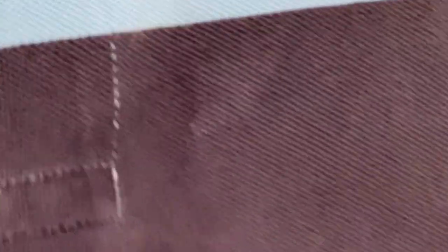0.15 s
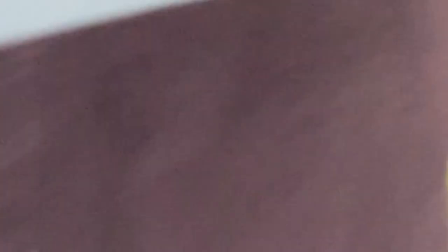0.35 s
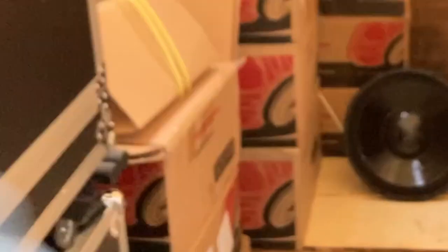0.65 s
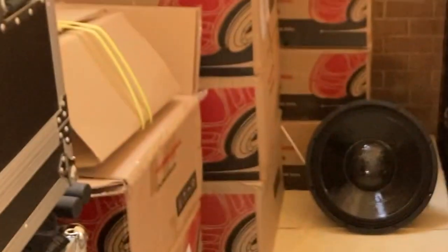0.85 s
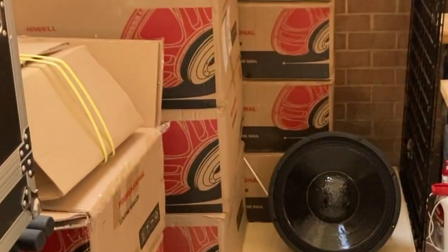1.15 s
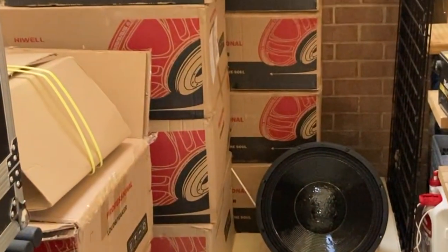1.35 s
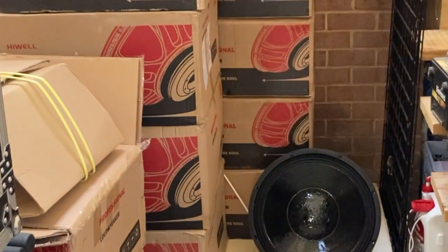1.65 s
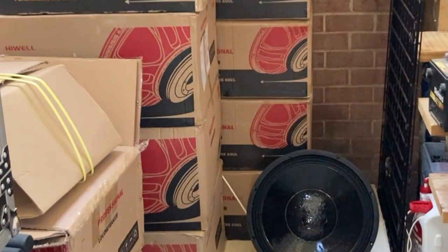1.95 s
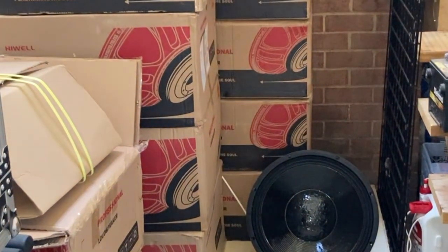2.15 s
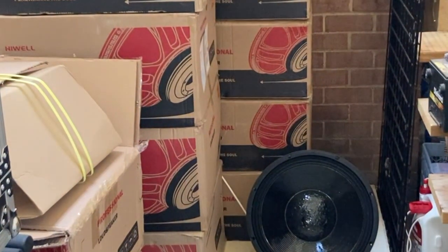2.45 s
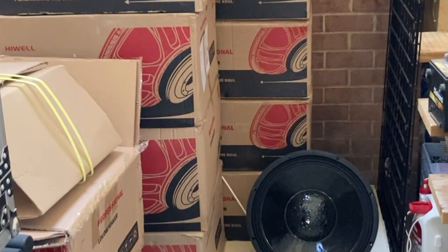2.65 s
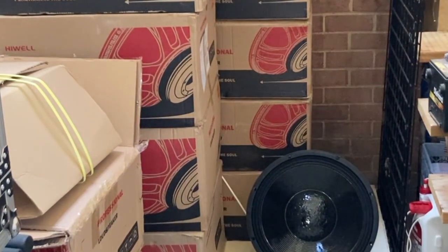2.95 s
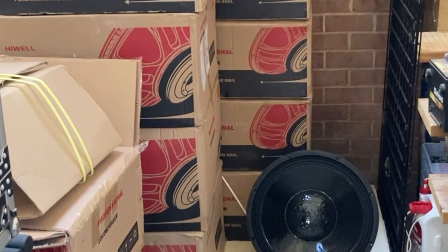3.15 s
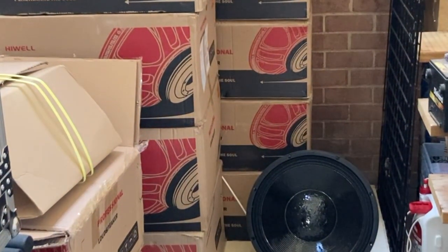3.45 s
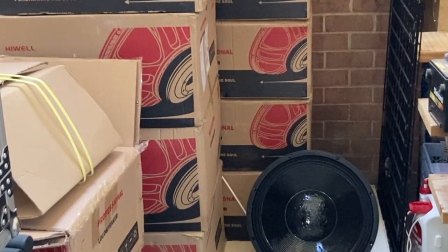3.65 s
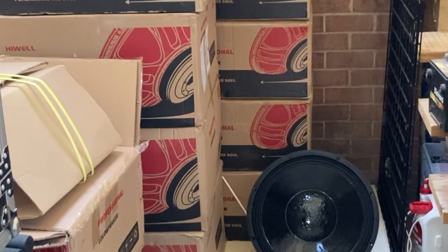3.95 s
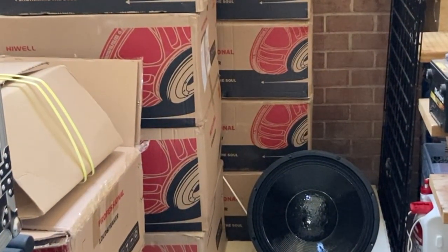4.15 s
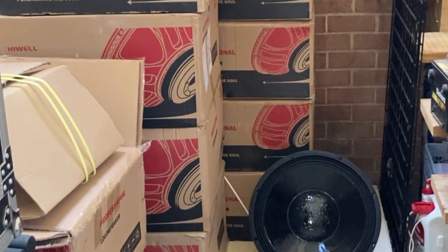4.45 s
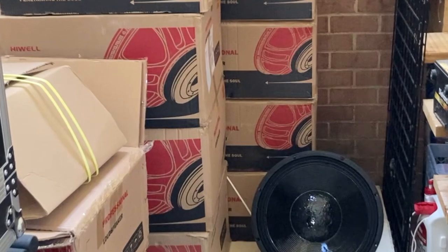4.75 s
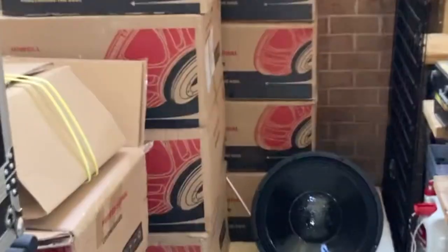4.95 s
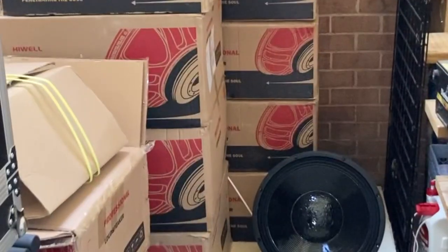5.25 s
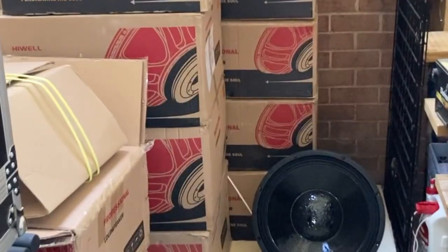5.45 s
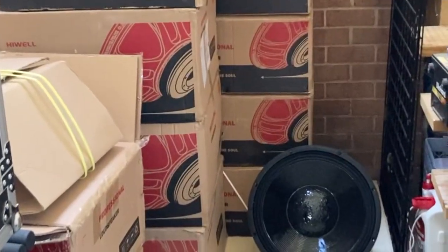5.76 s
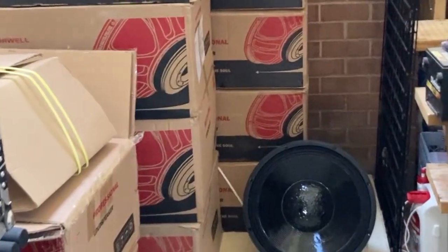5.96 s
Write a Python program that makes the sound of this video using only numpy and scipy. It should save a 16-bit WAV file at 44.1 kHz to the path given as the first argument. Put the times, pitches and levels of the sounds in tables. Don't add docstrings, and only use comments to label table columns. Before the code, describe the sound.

Muffled handling thumps and cloth rustle crowd the first three seconds, then near silence, broken by one late bump with a crisp latch snap.

```python
import sys
import numpy as np
from scipy import signal
from scipy.fft import rfft, irfft, next_fast_len
from scipy.io import wavfile
from scipy.ndimage import uniform_filter1d

SR = 44100
rng = np.random.default_rng(int(sys.argv[2]) if len(sys.argv) > 2 else 0)


def natural_amplitude(level_db):
    exponent = np.asarray(level_db, float) / 20
    return 10 ** exponent


def put_to_file(sound):
    columns = np.atleast_2d(sound).T
    safe = np.clip(columns, -1, 1)
    whole_steps = np.round(safe * 32767)
    wavfile.write(sys.argv[1], SR, whole_steps.astype(np.int16))


N = 268569


def unit(x):
    return x / np.sqrt(np.mean(x ** 2) + 1e-20)


def along(points, f_hz):
    f, value = np.transpose(points)
    return np.interp(np.log(f_hz + 1), np.log(f + 1), value)


def filtered(x, response):
    m = next_fast_len(N + SR // 2)
    f_hz = np.fft.rfftfreq(m, 1 / SR)
    return irfft(rfft(x, m) * response(f_hz), m)[..., :N]


def resonant(modes):
    def mode(f, k, centre, width, db):
        return (-1) ** k * natural_amplitude(db) * 1j * f * width / (centre * centre - f * f + 1j * f * width)
    return lambda f: sum(mode(f, k, *row) for k, row in enumerate(modes))


# f/Hz, correlation/1
LIKENESS = [(60, 0.93), (200, 0.89), (500, 0.067), (1500, 0.33), (8000, 0.62)]


def rush(spectrum, patchy_db, grain_db):
    grains = natural_amplitude(grain_db * unit(uniform_filter1d(rng.standard_normal(N), size=60)))
    z = signal.stft(grains * rng.standard_normal((2, N)), nperseg=512)[2]
    field = uniform_filter1d(rng.standard_normal(z.shape[1:]), size=3, axis=0)
    field = uniform_filter1d(field, size=8, axis=1)
    pair = signal.istft(z * natural_amplitude(patchy_db * unit(field)), nperseg=512)[1][:, :N]

    def mid_side(f):
        angle = np.arccos(np.clip(along(LIKENESS, f), -1, 1)) / 2
        return natural_amplitude(along(spectrum, f)) * np.array([np.cos(angle), np.sin(angle)])

    mid, side = filtered(pair, mid_side)
    return unit(np.array([mid + side, mid - side]))


def swells(rows, gain_db, follows):
    t_s, db, rise_s, fall_s, colour_db = np.transpose(rows)[..., None]
    late_s = np.arange(0, N + 64, 64) / SR - t_s
    below_db = 20 * np.where(late_s < 0, -late_s / rise_s, late_s / fall_s) ** 1.265
    power = natural_amplitude(db + gain_db + follows * colour_db - below_db) ** 2
    gain = np.sqrt(np.sum(power, axis=0))
    return np.interp(np.arange(N) / 64, np.arange(len(gain)), gain)


# t/s, left lag/samples
PORT_LAG = [(.5, -12), (.54, -20), (1.45, -19), (1.9, -12), (2.1, 12), (3.3, 12), (4.7, -19), (5.2, -19),
            (5.5, 12)]


def add(track, t_s, sound, pan_db):
    lag = np.interp(t_s, *np.transpose(PORT_LAG)) / 2
    for port, sign in zip(track, (1, -1)):
        rest = port[round(t_s * SR + sign * lag):][:len(sound)]
        rest += natural_amplitude(sign * pan_db / 2) * sound[:len(rest)]


def burst(t60_s, attack_s):
    t = np.arange(SR // 2) / SR
    return rng.standard_normal(len(t)) * natural_amplitude(-60 * t / t60_s) * (1 - np.exp(-t / attack_s))


# f/Hz, density/dB
HUM = [(12, -55.5), (25, -16), (59, -1.5), (115, -8), (330, -34), (900, -35.5), (1170, -68.5), (1980, -120)]


def hum():
    return natural_amplitude(-74) * rush(HUM, patchy_db=2.5, grain_db=-4.0)


# f/Hz, density/dB
HISS = [(300, -30), (700, -2), (2000, -6), (8000, -11), (12800, -11), (14500, -22), (15800, -26),
        (16100, -70)]


def hiss():
    return natural_amplitude(-81) * rush(HISS, patchy_db=4.0, grain_db=1.7)


# f/Hz, density/dB
BOOM = [(150, -47.5), (195, -2), (210, -1), (225, -7.5), (290, -50.5)]
# t/s, level/dB
WEIGHT = [(0, -67), (.6, -66.5), (1, -78), (1.2, -66.5), (1.9, -68), (2.2, -72.5), (2.45, -60), (3, -72),
          (3.4, -80.5), (6.09, -75.5)]


def boom():
    level_db = np.interp(np.arange(N) / SR, *np.transpose(WEIGHT))
    return natural_amplitude(level_db) * rush(BOOM, patchy_db=1.5, grain_db=2.5)


# peak t/s, level/dB, 20 dB rise/s, 20 dB fall/s, sway over rumble/dB
SHIFTS = [(.07, -52, 0.14, 0.43, -25), (.45, -64.5, 0.81, 0.15, 4.5), (.55, -50, 0.098, 0.14, 13.5),
          (.66, -52, 0.15, 0.17, 2), (.95, -74, 0.12, 0.14, 11), (1.2, -69.5, 0.35, 0.15, -12),
          (1.44, -45.5, 0.21, 0.02, -3), (1.51, -37.5, 0.061, 0.036, -12), (1.67, -59.5, 0.057, 0.15, 0),
          (1.98, -53.5, 0.41, 0.29, -20), (2.43, -59, 0.19, 0.44, -0.5), (2.73, -63, 0.46, 0.48, -14),
          (2.92, -60.5, 0.52, 0.16, 3), (3.14, -72.5, 0.78, 1.04, -1), (3.97, -68, 0.57, 1.7, -10.5),
          (4.94, -71, 0.34, 0.33, 7), (5.47, -61.5, 0.4, .35, -7.5), (6.08, -70, 0.52, 0.27, 3.5)]
# f/Hz, density/dB
RUMBLE = [(76, -33.5), (130, -3), (220, -6.5), (370, -4.5), (520, -7), (756, -17), (1500, -24), (2200, -91)]
# f/Hz, density/dB
SWAY = [(15, -120), (35, -10), (55, 0), (85, -1), (130, -8), (180, -40), (300, -120)]


def grip():
    rumble = rush(RUMBLE, patchy_db=2.2, grain_db=0.5)
    sway = rush(SWAY, patchy_db=1.5, grain_db=0)
    return swells(SHIFTS, 0, 0) * rumble + swells(SHIFTS, 0, 0.96) * sway


# peak t/s, level/dB, 20 dB rise/s, 20 dB fall/s, brightness/dB
STROKES = [(.11, -62.5, 1, 0.34, -1), (.48, -63, 0.053, 0.32, -3), (.628, -56, 0.01, 0.12, -3),
           (1.27, -62.5, 0.24, 0.19, 2.5), (1.39, -55, 0.099, 0.11, 1), (1.49, -59.5, 0.024, 0.1, -0.5),
           (1.95, -60.5, 0.52, 0.072, 0), (2.012, -58, 0.017, 0.035, -4), (2.1, -72, 0.17, 0.09, -2),
           (2.3, -71.5, 0.056, 0.49, -1), (2.41, -62, 0.013, 0.041, 3.5), (2.6, -82, 1, 0.81, -12.5),
           (2.77, -61, 0.028, 0.12, -2.5), (2.9, -76.5, 0.3, 0.069, -10), (3.08, -65.5, 0.18, 0.31, -2.5),
           (3.2, -67, 0.22, 0.11, -1), (3.29, -71, .15, .06, -3.5), (4.82, -73, 0.059, 0.31, 0.5)]
# f/Hz, density/dB
DRAG = [(400, -60), (800, -5), (1500, -3), (2200, -3), (2900, -6), (4200, -30)]
# f/Hz, density/dB
RUSTLE = [(1800, -44.5), (2800, -13), (3900, -6), (5500, -13), (7200, -9.5), (8600, -12), (9500, -59.5)]
# f/Hz, density/dB
SHEEN = [(7500, -47), (8500, -3), (10000, -3.5), (12000, -5.5), (14500, -4), (15800, -12.5), (16100, -55)]


def cloth():
    drag = swells(STROKES, 0, -1) * rush(DRAG, patchy_db=2.5, grain_db=2.0)
    rustle = swells(STROKES, 0, 0) * rush(RUSTLE, patchy_db=0.0, grain_db=-1.0)
    sheen = swells(STROKES, 2.5, 2.2) * rush(SHEEN, patchy_db=4.5, grain_db=0.0)
    return drag + rustle + sheen


# t/s, level/dB, hardness/dB, t60/s
KNOCKS = [(0.139, -54.5, -8, 0.97), (0.407, -67.5, 10, 0.066), (0.455, -27, -20.5, 0.092),
          (0.466, -29, -30.5, 0.3), (0.554, -26, -5.5, 0.063), (0.566, -28.5, -11, 0.27),
          (0.622, -41.5, -1.5, 0.2), (1.11, -61.5, -5, 0.25), (1.286, -46.5, 0, 0.29),
          (1.366, -40, -7.5, 0.35), (1.483, -34, -17.5, 0.059), (1.497, -60, -26, 0.075),
          (1.55, -40, -47, 0.28), (1.921, -35, -42, 0.18), (1.943, -53, -2.5, 0.48),
          (2.009, -51, -4.5, 0.14), (2.266, -34, -35.5, 0.26), (2.389, -56, 2, 0.35),
          (2.512, -48.5, -8.5, 0.29), (2.735, -33, -19.5, 0.28), (2.759, -44.5, -15, 0.15),
          (2.866, -48, -13, 0.25), (3.088, -60.5, -11, 0.49), (3.164, -54, -28, 0.39),
          (4.78, -50, -6, 0.27), (4.792, -38.5, -28, 0.12), (5.947, -63.5, -9, 0.085),
          (6.043, -77, 6, 0.37)]
# f/Hz, width/Hz, level/dB
FLOOR_MODES = [(147, 38, 5), (211, 68, 7), (359.3, 39, 2.5), (518.7, 39, 2.5), (645, 170, -3),
               (720.4, 18, 4), (914, 93, -1), (1106, 67, 1), (1220, 430, -7)]
# f/Hz, density/dB
EDGE = [(590, -51), (1000, -3.5), (1500, 5), (2500, -8), (4500, -19), (8300, -35.5), (11700, -96.5),
        (19800, -120)]


def padded(modes, top_hz):
    return lambda f: resonant(modes)(f) / (1 + 1j * f / top_hz) ** 2


def knocks():
    body, boards, upper, edge = np.zeros((4, 2, N))
    for t_s, db, hard_db, t60_s in KNOCKS:
        force = burst(0.043, 0.00072) + natural_amplitude(-4.0) * burst(0.7 * t60_s, 0.00038)
        add(body, t_s, natural_amplitude(db + 17) * force, -1)
        force = burst(0.044, 0.001) + natural_amplitude(-7) * burst(t60_s, 0.00077)
        add(boards, t_s, natural_amplitude(db + 21.5) * force, 2.2)
        force = burst(0.075, 0.00079) + natural_amplitude(-12) * burst(1.4 * t60_s, 0.00023)
        add(upper, t_s, natural_amplitude(db + 0.39 * hard_db + 24.0) * force, 2.6)
        force = burst(0.021, 0.00017) + natural_amplitude(-8.5) * burst(0.93 * t60_s, 0.0012)
        add(edge, t_s, natural_amplitude(db + hard_db + 16.0) * force, 1.8)
    low = filtered(body, padded(FLOOR_MODES[:2], top_hz=374))
    middle = filtered(boards, padded(FLOOR_MODES[2:5], top_hz=870))
    high = filtered(upper, padded(FLOOR_MODES[5:], top_hz=1770))
    bright = filtered(edge, lambda f: natural_amplitude(along(EDGE, f)))
    return low + middle + high + bright


# t/s, level/dB, f/Hz, t60/s
THUMPS = [(0.14, -52, 87.5, 0.18), (0.492, -31.5, 129, 0.092), (0.639, -45, 106, 0.073),
          (0.676, -44, 83, 0.045), (1.381, -24.5, 80, 0.072), (1.499, -22, 91.4, 0.062),
          (1.534, -35, 67, 0.14), (1.577, -36, 88, 0.14), (.75, -47, 63.3, 0.18), (2.109, -49, 47.7, 0.085),
          (1.952, -43, 83.5, 0.16), (2.008, -34, 165.7, 0.084), (2.032, -38.5, 95, 0.11),
          (2.467, -49.5, 68, 0.44), (2.508, -47, 98, 0.18), (2.753, -37, 95, 0.077),
          (2.871, -39, 61.9, 0.041), (2.929, -52, 64.7, 0.15), (4.8, -42, 266.6, 0.13),
          (4.827, -30.5, 89.4, 0.059), (4.855, -34, 83, 0.12), (4.922, -53, 99, 0.24),
          (4.997, -49, 101.3, 0.18), (5.299, -56, 103.7, 0.083), (5.564, -55, 75.7, 0.077),
          (5.759, -52, 82.5, 0.049), (5.892, -56, 61, 0.073), (5.926, -48, 65.4, 0.045),
          (.4585, -24, 158, .075),
    (.5585, -24, 160, .06),
    (.601, -33, 112, .07),
    (1.3082, -23, 87, .08),
    (4.7975, -30, 92, .1),
]


def thumps():
    out = np.zeros((2, N))
    t = np.arange(SR // 2) / SR
    for t_s, db, f_hz, t60_s in THUMPS:
        swell = (1 - np.exp(-t / 0.0026)) ** 2 * natural_amplitude(-60 * (t / t60_s) ** 1.38)
        add(out, t_s, -natural_amplitude(db + 1.0) * swell * np.sin(2 * np.pi * f_hz * t), -1.3)
    return out


# t/s, level/dB, top/dB, t60/s, left-right/dB
CLICKS = [(0.626, -51.5, -11, 0.02, -6), (1.2849, -26, -10.5, 0.008, 4), (1.2939, -30.5, -18, 0.02, -4.5),
          (1.843, -55, -14, 0.014, 9.5), (1.8576, -51, -8.5, 0.011, -5), (1.879, -58.5, -11, 0.0086, 10),
          (1.9328, -50, -11.5, 0.017, 5), (2.407, -51.5, -3.5, 0.0047, -2),
          (2.8653, -56.5, -25, 0.022, -2.5), (4.789, -53, -5.5, 0.01, 7), (5.9069, -70, -14.5, 0.021, 8),
          (5.9344, -66, -12.5, 0.019, 3.5)]
# t/s, level/dB, top/dB, t60/s, left-right/dB
LATCH = [
    (4.8021, -35.5, 5.7, 0.0018, 0.93),
    (4.8135, -38, 1.8, 0.0013, 0.67),
    (4.8853, -57, 3.4, 0.0021, 0.81),
    (4.8902, -65, 5, 0.0024, 1),
]
# f/Hz, width/Hz, level/dB
CATCH_MODES = [(1400, 900, -14), (2345, 260, 0), (2800, 330, -1), (3700, 700, -6), (4600, 1000, -10)]
# f/Hz, width/Hz, level/dB
SHELL_MODES = [(7000, 6000, 1), (11090, 2800, 1), (13900, 1400, -5.5)]


def clicks():
    catch, shell = np.zeros((2, 2, N))
    rows = [(*row, -16) for row in CLICKS] + [(*row, -49.5) for row in LATCH]
    for t_s, db, top_db, t60_s, pan_db, rattle_db in rows:
        force = burst(t60_s, 0.000069) + natural_amplitude(rattle_db) * burst(0.28, 0.002)
        add(catch, t_s, natural_amplitude(db + 17.5) * force, 2.8 * pan_db)
        force = burst(0.99 * t60_s, 0.000067) + natural_amplitude(rattle_db - 9) * burst(0.4, 0.0027)
        add(shell, t_s, natural_amplitude(db + top_db + 24.0) * force, 0.14 * pan_db)
    return filtered(catch, resonant(CATCH_MODES)) + filtered(shell, resonant(SHELL_MODES))


# f/Hz, t60/s
ROOM_T60 = [(100, 0.16), (600, 0.083), (3000, 0.51), (5500, 0.037), (10000, 0.04)]


def room(x):
    f_hz, t, z = signal.stft(rng.standard_normal((2, SR // 2)), SR, nperseg=256)
    decay = natural_amplitude(-60 * t / along(ROOM_T60, f_hz)[:, None])
    tail = signal.istft(z * decay, SR, nperseg=256)[1]
    late = np.pad(x, ((0, 0), (300, 0)))
    return signal.fftconvolve(late, tail / np.linalg.norm(tail[0]), axes=1)[:, :N]


def scene():
    blows, bounce, ticks = knocks(), thumps(), clicks()
    far_ticks = natural_amplitude(-17) * filtered(ticks, lambda f: 1 / (1 + 1j * f / 3500) ** 2)
    echo = room(natural_amplitude(-10) * blows + natural_amplitude(-35.5) * bounce + far_ticks)
    contacts = blows + bounce + ticks + echo
    return hum() + hiss() + boom() + grip() + cloth() + contacts


def band_limit(x):
    return signal.sosfilt(signal.butter(12, 16990, fs=SR, output="sos"), x)


# centre f/Hz, half width/Hz
QUIET_BANDS = [(9050, 620), (13650, 800)]


def record(dry):
    def band_gaps(f):
        notch = np.prod([natural_amplitude(-36 * np.exp(-((f - c) / w) ** 4)) for c, w in QUIET_BANDS], axis=0)
        limit = natural_amplitude(-13 * (1 + np.tanh((f - 15900) / 120)))
        return notch * limit

    mix = filtered(dry, band_gaps)
    return band_limit(mix)


dry = scene()
out = record(dry)
put_to_file(out)
```